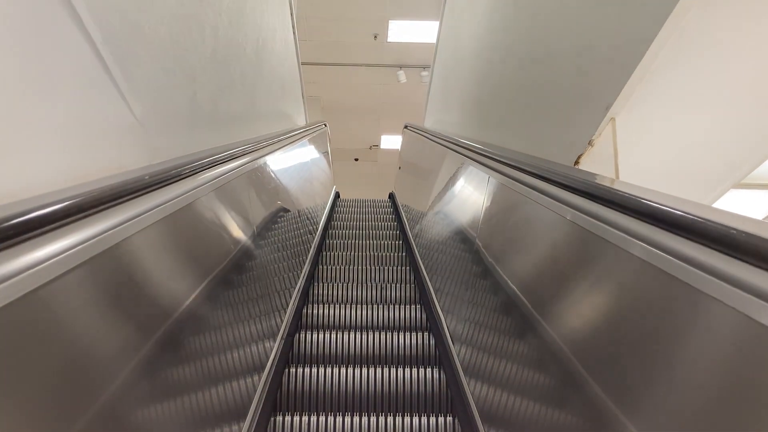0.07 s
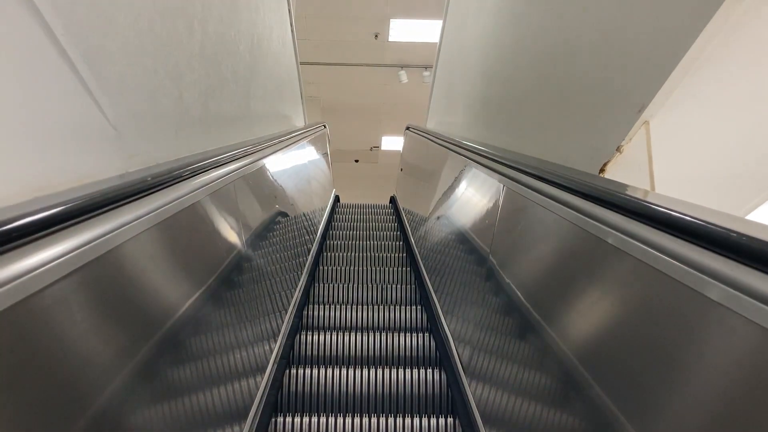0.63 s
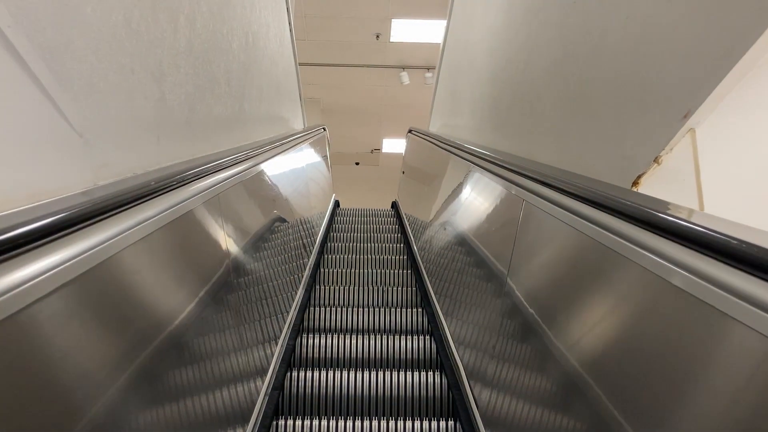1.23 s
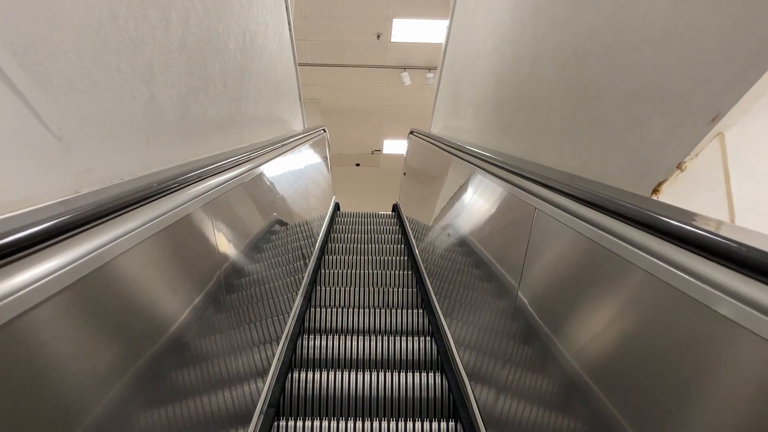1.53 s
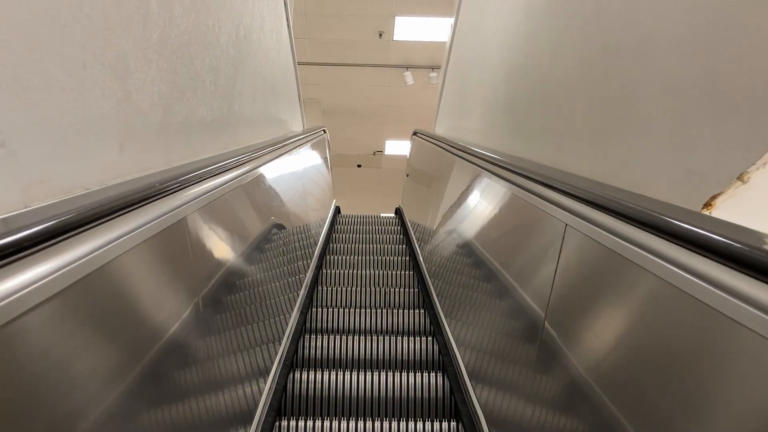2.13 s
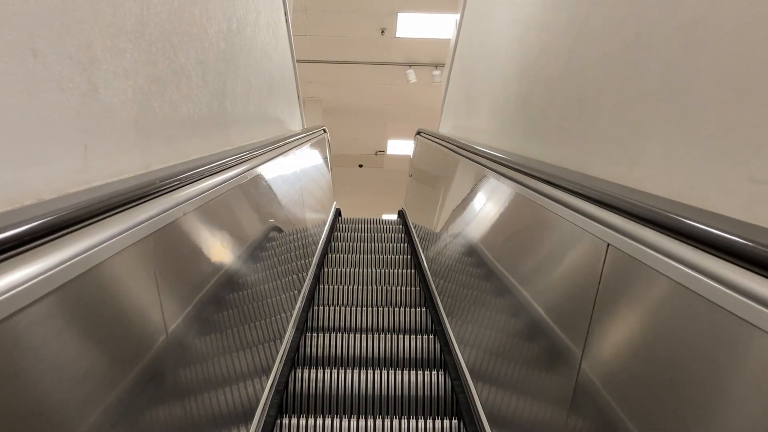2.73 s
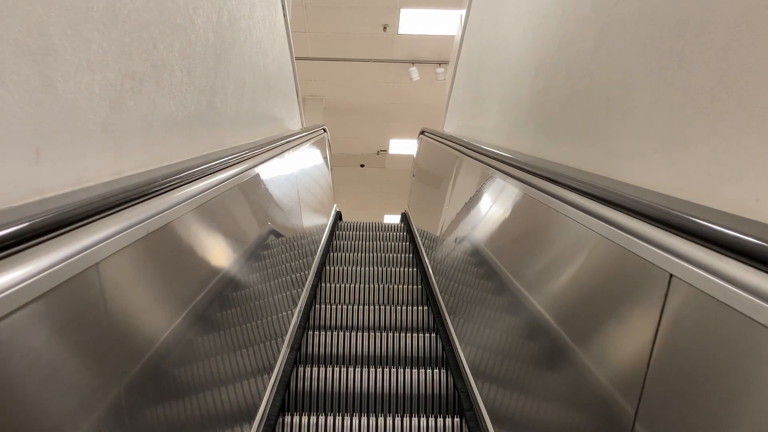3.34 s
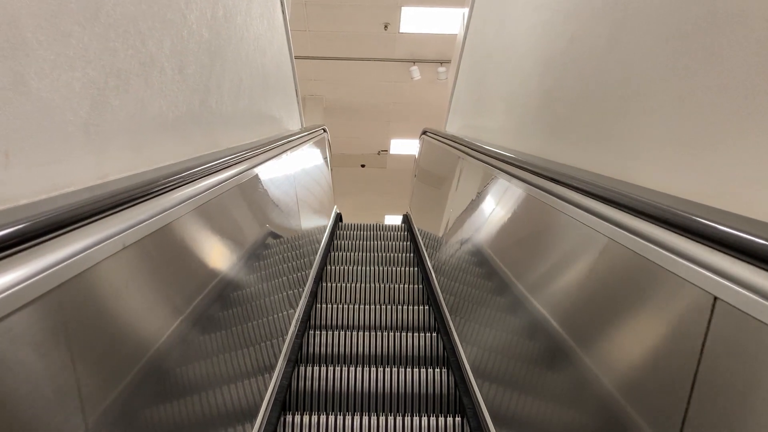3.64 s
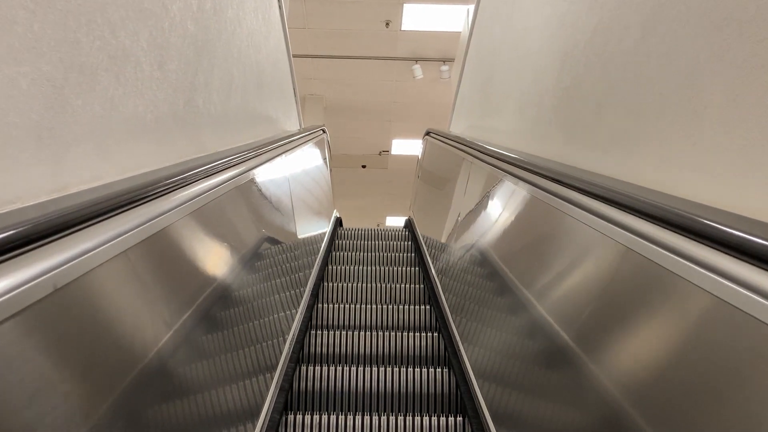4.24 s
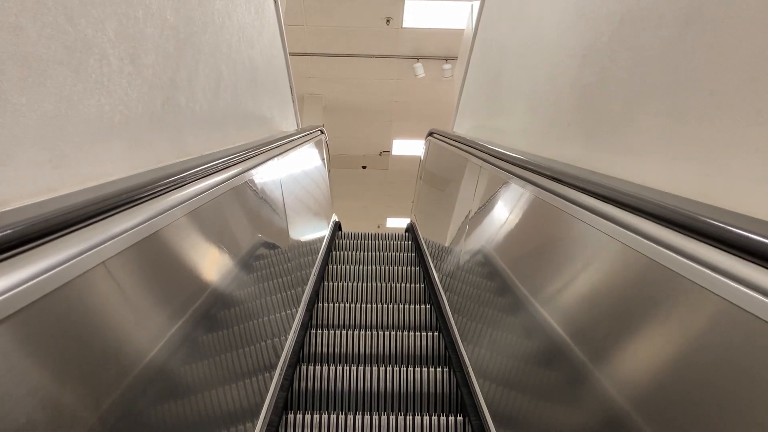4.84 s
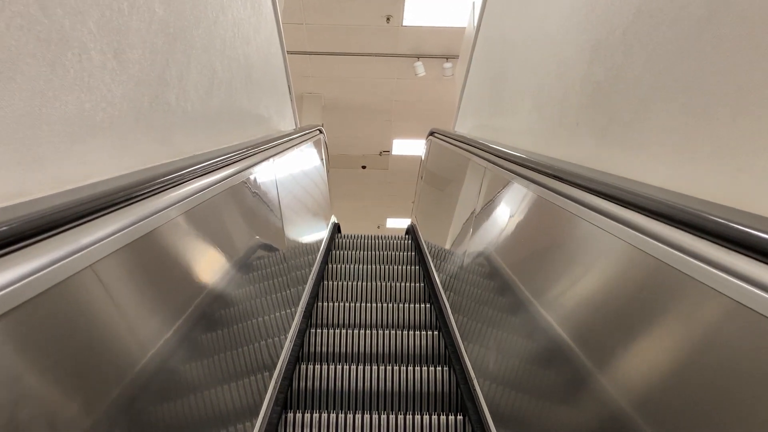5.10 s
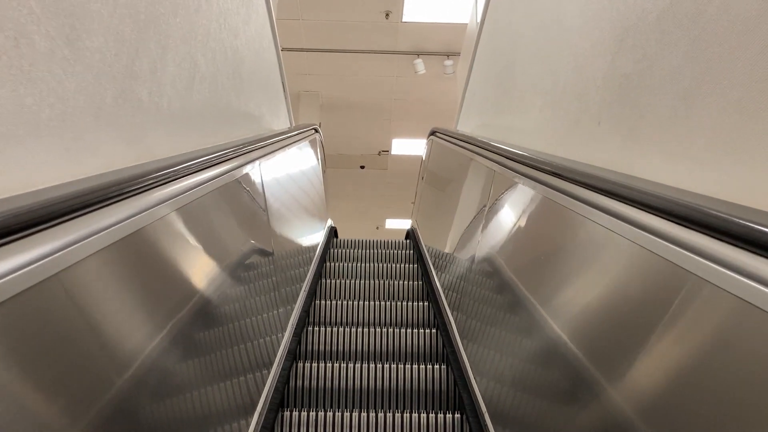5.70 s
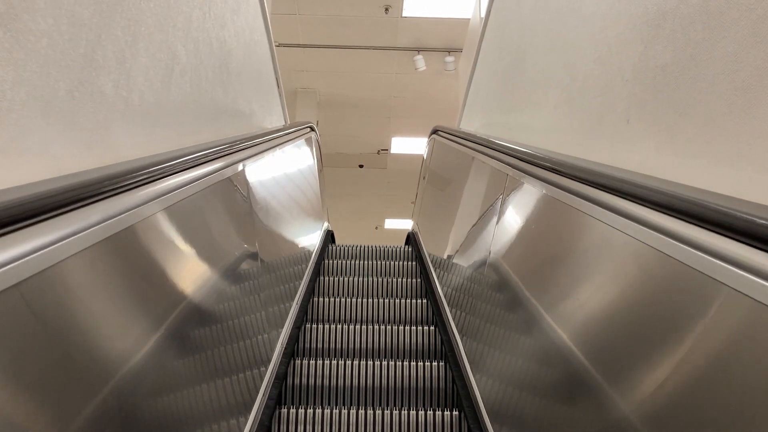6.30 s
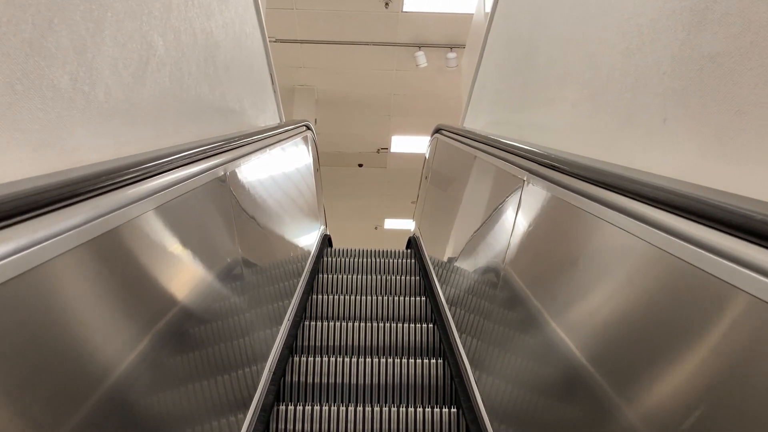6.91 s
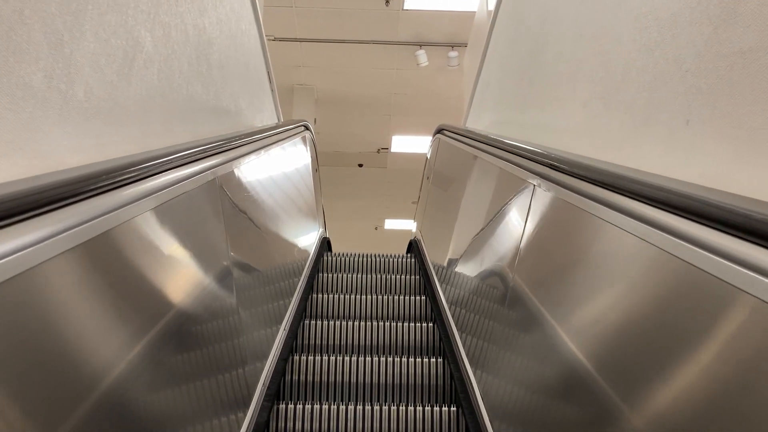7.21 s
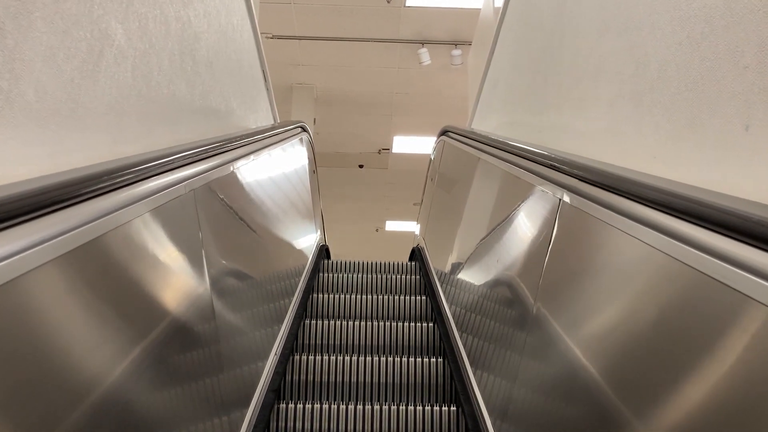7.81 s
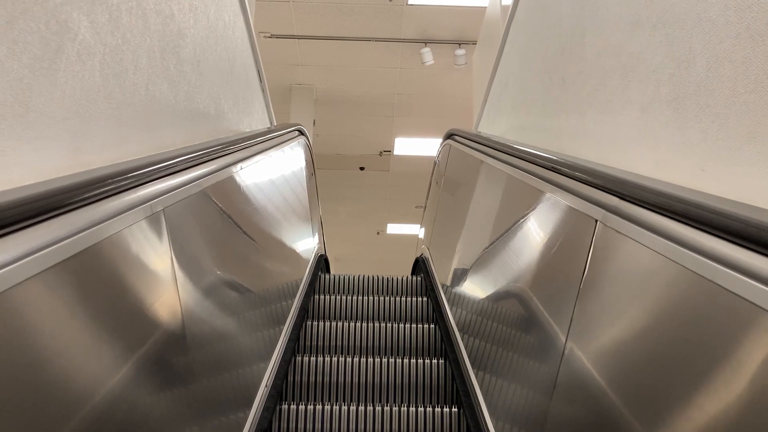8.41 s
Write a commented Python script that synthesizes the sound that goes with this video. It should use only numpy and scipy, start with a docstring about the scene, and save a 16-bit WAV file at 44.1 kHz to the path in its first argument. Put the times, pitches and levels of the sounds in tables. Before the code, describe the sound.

An old escalator runs inside a shop, heard from a step riding upward. A low motor hum, deep rumble and rolling noise continue throughout, with soft bumps in the steel side panels. Ahead, metal steps clack lightly about four times a second. A few dry scuffs sound close by, mostly near the start. The hum and clacks grow louder as the top nears, over a faint hiss.

```python
"""Escalator steps clack over the top turn about four times a second, taking up slack and ringing.
The microphone rides up on a step, between steel side panels in a shop, so the clacks draw nearer.
Underfoot the old drive hums and rumbles, the truss drones and the rollers run and bump in their tracks;
drone and rollers swell once in each turn of the chain wheel. Something scuffs close by a few times,
mostly early on, and a faint hiss lies behind it all."""
import sys
import numpy as np
from scipy import signal
from scipy.fft import rfft, irfft, next_fast_len
from scipy.io import wavfile
from scipy.ndimage import uniform_filter1d, map_coordinates

SR = 44100
rng = np.random.default_rng(int(sys.argv[2]) if len(sys.argv) > 2 else 0)


def put_to_file(sound):
    """Save the sound as 16-bit audio at rate SR, in the file named by the first command-line argument."""
    columns = np.atleast_2d(sound).T  # one column per channel
    safe = np.clip(columns, -1, 1)
    whole_steps = np.round(safe * 32767)
    wavfile.write(sys.argv[1], SR, whole_steps.astype(np.int16))


N = 377055
TIME = np.arange(N) / SR


def amp(db):
    """Decibels to gain."""
    return 10 ** (np.asarray(db) / 20)


def unit(x):
    """x at rms 1."""
    return x / np.sqrt(np.mean(x ** 2) + 1e-20)


def steady(x):
    """x at rms 1 with its slow chance swells evened out, as under a steady push."""
    power = np.abs(uniform_filter1d(np.mean(x ** 2, 0), size=6000))
    return unit(x / np.sqrt(power + 1e-6))


def at_hz(points, hz):
    """(frequency [Hz], value) points read on a log axis."""
    freqs, values = np.transpose(points)
    return np.interp(np.log(hz + 1), np.log(freqs + 1), values)


def over_time(points):
    """(time [s], value) points read at every sample."""
    return np.interp(TIME, *np.transpose(points))


def wobble(rate):
    """A smooth random curve, rate knots a second."""
    knots = rng.standard_normal(int(N * rate / SR) + 4)
    return map_coordinates(knots, [TIME * rate])


def filtered(x, response):
    """x through a complex response of frequency."""
    n = x.shape[-1]
    padded = next_fast_len(n + 8192)
    return irfft(rfft(x, padded) * response(np.fft.rfftfreq(padded, 1 / SR)), padded)[..., :n]


def resonances(modes, hz):
    """Causal response of (frequency [Hz], width [Hz], gain [dB]) modes, alternating in sign."""
    return sum((-1) ** k * amp(db) * 1j * hz * width / (centre ** 2 - hz ** 2 + 1j * hz * width)
               for k, (centre, width, db) in enumerate(modes))


def pan(x, left_db):
    """Lean a sound to the microphone's left by left_db."""
    return x * amp([[left_db / 2], [-left_db / 2]])


# Likeness of the microphone's two channels: (frequency [Hz], correlation [-1 to 1])
CHANNEL_LIKENESS = [(60, 0.98), (150, 0.93), (320, 0.84), (500, 0.091), (800, 0.23), (1200, 0.33),
                    (1700, -0.41), (2600, 0.28), (4500, -0.066), (6000, -0.076)]
def stereo_noise(response):
    """Noise of rms 1 around the microphone: alike in the bass, diffuse in the treble."""
    def spread(hz):
        angle = np.arccos(at_hz(CHANNEL_LIKENESS, hz)) / 2
        return response(hz) * np.array([np.cos(angle), np.sin(angle)])
    mid, side = filtered(rng.standard_normal((2, N)), spread)
    return unit(np.array([mid + side, mid - side]))


def rush(spectrum, patchy_db=2):
    """Stereo noise in shifting patches of louder and softer; the treble stays smooth."""
    noise = stereo_noise(lambda hz: amp(at_hz(spectrum, hz)))
    hz, _, bins = signal.stft(noise, SR, nperseg=2048)
    patches = uniform_filter1d(rng.standard_normal(bins.shape[1:]), size=3, axis=0)
    patches = unit(uniform_filter1d(patches, size=6, axis=1))
    depth_db = patchy_db / np.sqrt(1 + (hz[:, None] / 3000) ** 2)
    return unit(signal.istft(bins * amp(depth_db * patches), nperseg=2048)[1][:, :N])


def ringing(modes, top_hz=3500):
    """Stereo noise of rms 1 ringing in the given modes."""
    return stereo_noise(lambda hz: resonances(modes, hz) / (1 + (hz / top_hz) ** 4))


def chain_load(lead_s, turn_s=.965, first_peak_s=.31):
    """The chain wheel runs out of true: its load, -1 to 1, peaks once a turn. Read lead_s ahead."""
    return np.cos(2 * np.pi * (TIME + lead_s - first_peak_s) / turn_s)


# The shop around the escalator: (frequency [Hz], time to fade by 60 dB [s])
SHOP_DECAY = [(300, .5), (1200, 0.07), (8000, 0.37)]
def shop_tail(n):
    """The shop's reverberation: a fresh stereo tail, energy about 1 per channel."""
    hz, t, bins = signal.stft(rng.standard_normal((2, n)), SR, nperseg=256)
    fade = amp(-60 * t / at_hz(SHOP_DECAY, hz)[:, None])
    tail = signal.istft(bins * fade, SR, nperseg=256)[1]
    return tail / np.linalg.norm(tail[0])


# Hiss in the background: (frequency [Hz], relative density [dB])
HISS_SPECTRUM = [(3000, -25), (5500, -8), (7000, -2), (8700, -.5), (11000, -2), (13000, -6.5), (15500, -14)]
def hiss(level_db=-50.4, lag_s=10.2 / SR, offset_rad=4.05):
    """One thin, steady hiss in both channels, shifted in phase and a hair later on the left."""
    def response(hz):
        phase_gap = offset_rad - 2 * np.pi * hz * lag_s
        return amp(at_hz(HISS_SPECTRUM, hz)) * np.exp(1j * phase_gap / 2 * np.array([[1], [-1]]))
    return amp(level_db) * unit(filtered(rng.standard_normal(N), response))


# The motor, louder as the microphone nears it: (time [s], level [dB])
HUM_LEVEL = [(0.0, -35.5), (1.6, -36.5), (3.9, -30.5), (5.4, -31), (5.9, -28.5), (7.5, -28.5), (8.55, -33)]
def motor_hum(mains_hz=60, waver_db=1.9, waver_rad=.36, waver_rate=11):
    """The motor hums at twice the mains frequency, wavering in level and phase."""
    drift = .42 * wobble(.93)  # riding through the standing waves slowly turns the phase
    phase = 2 * np.pi * 2 * mains_hz * TIME + drift + waver_rad * wobble(waver_rate)
    gain = amp(over_time(HUM_LEVEL) + waver_db * wobble(waver_rate))
    return pan(gain * unit(np.sin(phase)), left_db=-1.4)


# Rumble right under the microphone: (frequency [Hz], relative density [dB])
RUMBLE_SPECTRUM = [(15, -50), (23, -25), (30, -3.5), (46, 9), (56, 6), (67, 8), (79, 4), (90, 6.5),
                   (105, 0), (130, 0.5), (200, -65.5)]
# Its strength along the ride: (time [s], level [dB])
RUMBLE_RIDE = [(0.0, -26), (0.32, -24.5), (0.62, -26), (1.1, -27), (2.15, -25.5), (2.6, -26.5), (4.0, -26),
               (7.1, -25), (8.55, -23.5)]
def drive_rumble():
    """The running drive sends a deep, uneven rumble up through the step."""
    gain = amp(over_time(RUMBLE_RIDE) + 1.62 * wobble(12))
    return pan(gain * steady(rush(RUMBLE_SPECTRUM)), left_db=-2)


# The truss below and the panels to either side: (frequency [Hz], width [Hz], gain [dB])
TRUSS_MODES = [(147.5, 14.4, -1), (174.2, 15.4, 1), (227.6, 12.6, -2), (248.7, 9.8, 3), (261.4, 19.6, -4),
               (309.7, 4, -0.5), (335.8, 4.6, -4.5), (480, 18, -11)]
# The broad noise around those modes: (frequency [Hz], relative density [dB])
DRONE_SPECTRUM = [(90, -50), (130, -2.5), (200, -2), (290, -1.5), (350, -3.5), (390, -15), (500, -80)]
def truss_drone(base_db=-31, bass_boost_db=3, split_hz=166, growth_db_per_s=.44, swing_db=1):
    """The chain shakes the truss. Bass carries along all of it; the rest grows as the top nears."""
    truss = steady(amp(-3.5) * ringing(TRUSS_MODES) + rush(DRONE_SPECTRUM, patchy_db=2.5))
    bass = filtered(truss, lambda hz: 1 / (1 + (hz / split_hz) ** 10))
    nearing = amp(bass_boost_db) * bass + amp(growth_db_per_s * TIME) * (truss - bass)
    gain = amp(base_db + swing_db * chain_load(lead_s=.21) + 1.6 * wobble(14))
    return pan(gain * nearing, left_db=-.3)


# The machine pit at the top landing: (frequency [Hz], width [Hz], gain [dB])
PIT_MODES = [(88.5, 5.4, 1), (483, 10.4, -28)]
# The pit as the microphone approaches: (time [s], level [dB])
PIT_APPROACH = [(0, -47), (5, -43), (6.4, -31), (7.3, -37), (8.35, -28.5), (8.55, -30)]
def machine_pit():
    """The pit resonates with a low note, a little to the right."""
    return pan(amp(over_time(PIT_APPROACH)) * steady(ringing(PIT_MODES)), left_db=-2)


# Booms in the panels around the microphone: (time [s], level [dB], pitch [Hz])
PANEL_BOOMS = [(0.195, -27, 245), (0.23, -21.5, 177), (0.63, -26.5, 239), (0.99, -21.5, 152),
               (1.985, -26.5, 234), (2.745, -31.5, 343), (2.95, -30, 340), (3.815, -23.5, 300),
               (5.004, -22.5, 147), (5.09, -31, 327), (5.585, -28, 337), (5.699, -24.5, 236),
               (5.729, -24.5, 163), (5.83, -27, 188), (6.04, -33.5, 316), (6.65, -29, 177),
               (6.762, -25, 255), (6.98, -24.5, 301), (7.14, -26, 236), (7.85, -24, 238), (7.88, -23, 177),
               (7.935, -24, 297), (8.045, -25, 253), (8.325, -28, 251)]
def panel_booms(width_hz=54, half_length_s=.03):
    """A roller bumps over a track joint and makes one panel boom briefly."""
    out = np.zeros(N)
    for at_s, db, pitch_hz in PANEL_BOOMS:
        span = np.abs(TIME - at_s) < .2
        noise = rng.standard_normal(span.sum())
        boom = filtered(noise, lambda hz: resonances([(pitch_hz, width_hz, 0)], hz) ** 2)
        swell = np.exp(-((TIME[span] - at_s) / half_length_s) ** 2)
        boom_rms = np.sqrt(np.average(boom ** 2, weights=swell ** 2))
        out[span] += amp(db) * swell * boom / boom_rms
    return pan(out, left_db=.5)


# Rollers in the tracks underfoot: (frequency [Hz], relative density [dB])
ROLLER_SPECTRUM = [(250, -17.5), (400, -2), (475, -1), (660, -2.5), (860, -8), (980, -8.5), (1280, -8),
                   (1480, -13), (1850, -12.5), (2900, -17.5), (3800, -20), (5000, -23), (8000, -32.5),
                   (14000, -120)]
def rollers(level_db=-36, load_swing_db=1, body_hz=2000):
    """Wheels roll unevenly. The noise's body follows their load; the fine sliding above hardly does."""
    noise = rush(ROLLER_SPECTRUM)
    body = filtered(noise, lambda hz: 1 / (1 + (hz / body_hz) ** 4))
    swing_db = load_swing_db * chain_load(lead_s=.17) + 1.7 * wobble(18)
    rolling = amp(swing_db) * body + amp(.12 * swing_db) * (noise - body)
    return pan(amp(level_db) * rolling, left_db=.9)


# Dry scuffs close by: (time [s], level [dB], half length [s], treble tilt [dB per octave])
SCUFF_EVENTS = [(0.237, -36, 0.057, -14.5), (0.35, -49, .04, 9), (0.37, -35.5, 0.014, -7),
                (0.402, -41.5, 0.019, 5), (0.44, -38.5, 0.039, -11.5), (0.79, -40, 0.015, -4),
                (0.805, -32.5, 0.031, -3), (1.192, -39.5, 0.086, -13.5), (1.644, -43.5, 0.027, -4),
                (2.688, -44, 0.034, -4), (6.658, -47, .03, -3)]
# The rub before its tilt: (frequency [Hz], relative density [dB])
SCUFF_SPECTRUM = [(200, -50), (900, 6.5), (1800, 2.5), (2500, 6), (3200, 5), (4100, 4.5), (6000, -1),
                  (7500, 0.5), (9000, -7), (11500, 10.5), (15500, -7)]
# The panel that a scuff rings: (frequency [Hz], width [Hz], gain [dB])
PANEL_MODES = [(1590, 78, 2), (2430, 170, 5.5), (3500, 180, 0), (4250, 390, 5), (7040, 530, 6)]
def scuffs(catches_per_s=900, catch_db=-4, room_db=-6.5):
    """Short rubs swell and fade; tiny catches in each ring the panel, and the shop echoes them."""
    out = np.zeros((2, N))
    for at_s, db, half_length_s, tilt_db in SCUFF_EVENTS:
        def colour(hz):
            tilted_db = at_hz(SCUFF_SPECTRUM, hz) + tilt_db * np.log2(hz / 4000 + .074)
            return amp(tilted_db) * (1 + np.abs(resonances(PANEL_MODES, hz)))
        span = np.abs(TIME - at_s) < .3
        smooth, catch_sizes = rng.standard_normal((2, 2, N))[..., span]
        catches = unit(catch_sizes * (rng.random(N)[span] < catches_per_s / SR))
        rub = unit(filtered(smooth + amp(catch_db) * catches, colour))
        swell = np.exp(-((TIME[span] - at_s) / half_length_s) ** 2)
        out[:, span] += amp(db) * swell * rub
    out *= amp(2.2 * wobble(230))  # a fast flutter roughens the rubs
    echo = signal.fftconvolve(out, shop_tail(SR // 2), axes=1)[:, :N]
    return out + amp(room_db) * echo


# A step's ring, underfoot or up at the turn: (frequency [Hz], width [Hz], gain [dB])
STEP_RING = [(707, 260, -11), (982, 33, 4), (1077, 55, -1), (1152, 42, 1), (1254, 53, 6.5), (1365, 33, -3),
             (1466, 160, -3.5), (1630, 42, 0), (1692, 24, 1.5), (2254, 110, -10)]
def step_chatter(level_db=-50.5, load_swing_db=1):
    """Rolling keeps the steps faintly ringing, more so under load."""
    gain = amp(level_db + load_swing_db * chain_load(lead_s=.17) + 4.4 * wobble(22))
    return pan(gain * ringing(STEP_RING), left_db=.9)


# Borders of a step's low, middle and high modes: (frequency [Hz])
MODE_BORDERS = [0, 1110, 1400, 20000]
def clack(levels_db, slack, contacts_per_s=2500, rattle_db=1.5, side_db=-6, room_db=-7, soft_hz=2300):
    """A step takes up its slack in a quick cluster of contacts, then rattles; all ring its modes."""
    rise_s, settle_s, rattle_s = .0053 * slack, .013 * slack, .035 * slack
    n = SR // 2
    t = np.arange(n) / SR - .018  # zero where the step seats
    press = np.exp(np.minimum(t / rise_s, -t / settle_s))
    rattle = amp(rattle_db) * np.exp(np.minimum(t / rise_s, -t / rattle_s))
    signs = rng.choice([-1, 1], (2, n))
    contacts = signs * (rng.random((2, n)) < contacts_per_s / SR) * (press + rattle)
    contacts[0, np.argmax(press)] += 1.2  # one more contact as it seats
    # no two steps ring quite alike
    modes = [(hz * (1 + rng.normal(0, .006)), width, db + rng.normal(0, 1.2))
             for hz, width, db in STEP_RING]
    cushion = lambda hz: 1 / np.sqrt(1 + (hz / soft_hz) ** 10)  # soft wheels give little treble
    tail, out = shop_tail(n), np.zeros((2, n))
    # where the step is struck decides how hard each group of modes rings
    for db, low_hz, high_hz in zip(levels_db, MODE_BORDERS, MODE_BORDERS[1:]):
        group = [mode for mode in modes if low_hz <= mode[0] < high_hz]
        direct, mirrored = filtered(contacts, lambda hz: resonances(group, hz) * cushion(hz))
        # the side panels mirror the clack differently to each side of the microphone
        near = unit(direct) + amp(side_db) * unit(mirrored) * np.array([[1], [-1]])
        far = unit(signal.fftconvolve(direct[None], tail, axes=1)[:, :n])
        out += amp(db) * unit(near + amp(room_db) * far)
    return out


# Steps at the top turn, ahead of the microphone, with the relative level of each group of modes:
# (time [s], low [dB], middle [dB], high [dB], slack [1 is usual, less is tighter])
STEP_CLACKS = [(0.233, -53, -50, -49.5, 1.8), (0.362, -55, -49, -47, 0.4), (0.373, -45, -49, -48, 0.9),
               (0.395, -48, -60, -55, 1.2), (0.471, -44.5, -48, -55, 1.6), (0.96, -64, -56, -65, 1.5),
               (1.177, -45.5, -47, -50, 1.4), (1.415, -49, -46.5, -57, 1.6), (1.653, -54.5, -51, -62, 0.89),
               (2.123, -46, -48, -59, 0.93), (2.372, -60, -49, -51.5, 0.89), (2.848, -53, -56, -58, 1.8),
               (3.074, -47, -49, -53, 0.75), (3.311, -45, -42.5, -52, 1), (3.558, -48.5, -50.5, -58, 1.3),
               (3.79, -48, -50.5, -62, 1.3), (4.019, -47.5, -51, -59, 1), (4.259, -46, -47, -56, 1.3),
               (4.499, -47, -53, -56, 1.2), (4.741, -47.5, -57, -55, 1.4), (4.971, -54, -48.5, -58, 0.77),
               (5.209, -45.5, -43.5, -49.5, 0.95), (5.444, -48, -45.5, -53, 0.74),
               (5.667, -53, -50, -70, 1), (5.922, -41.5, -40, -46.5, 1), (6.156, -42, -42, -50, 0.75),
               (6.397, -44, -47, -61, 0.76), (6.866, -47.5, -43.5, -63, 0.6),
               (7.103, -39.5, -39.5, -46.5, 0.73), (7.338, -46.5, -48, -63, 1.6),
               (7.564, -49, -58, -57, 0.72), (7.814, -41.5, -43.5, -52, 0.73),
               (8.05, -39.5, -40.5, -57, 0.58), (8.294, -39.5, -48, -53, 0.75)]
def steps(gain_db=-.7, lead_s=.02):
    """Steps clack over the turn, louder as the top nears; an early one strikes three times."""
    out = np.zeros((2, N + SR))
    for at_s, *levels_db, slack in STEP_CLACKS:
        hit = amp(gain_db) * clack(levels_db, slack)
        start = round((at_s - lead_s) * SR)
        out[:, start:start + hit.shape[1]] += hit
    return pan(out[:, :N], left_db=1.5)


def scene():
    """Everything that reaches the microphone on its moving step."""
    drive = motor_hum() + drive_rumble() + truss_drone() + machine_pit()
    tracks = panel_booms() + rollers() + step_chatter()
    return drive + tracks + steps() + scuffs() + hiss()


def record(dry, top_hz=15750):
    """The microphone's recorder keeps nothing above its band limit."""
    return filtered(dry, lambda hz: hz < top_hz)


dry = scene()
out = record(dry)
put_to_file(out)
```